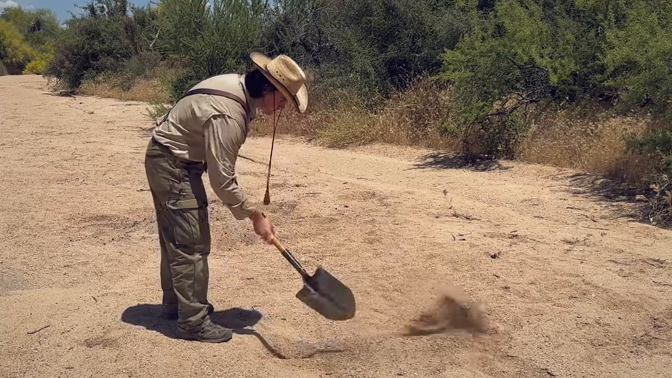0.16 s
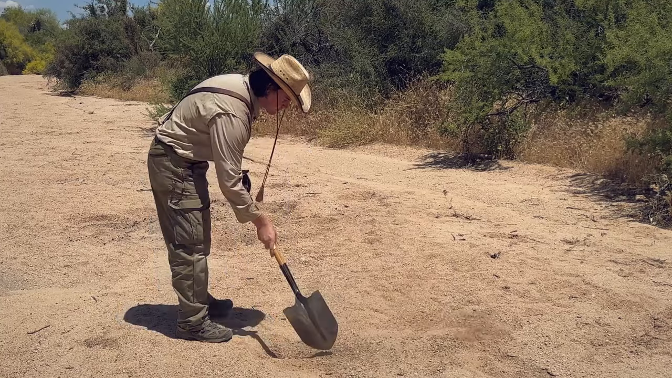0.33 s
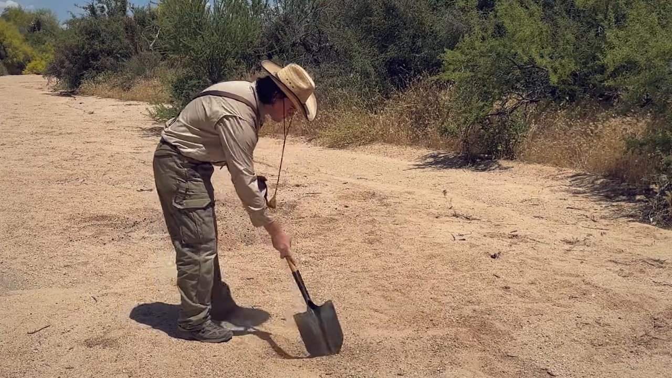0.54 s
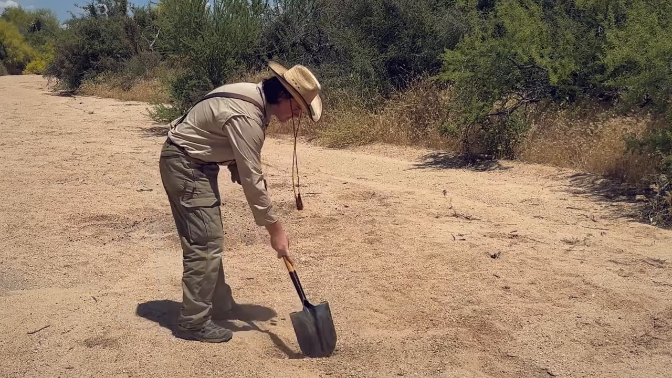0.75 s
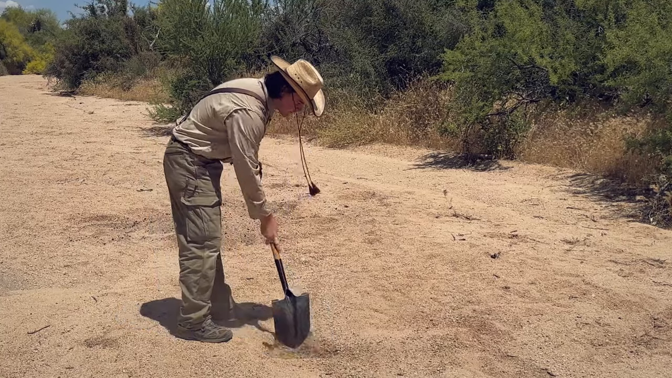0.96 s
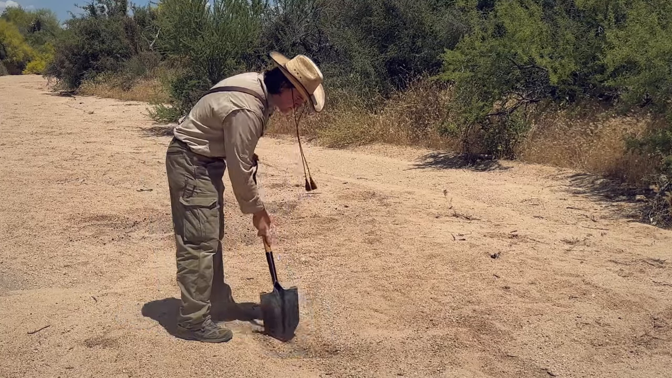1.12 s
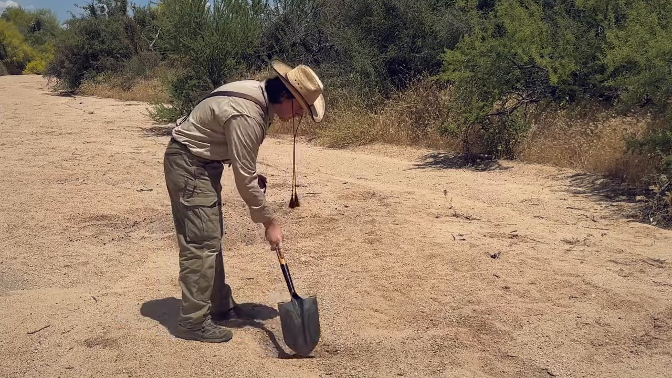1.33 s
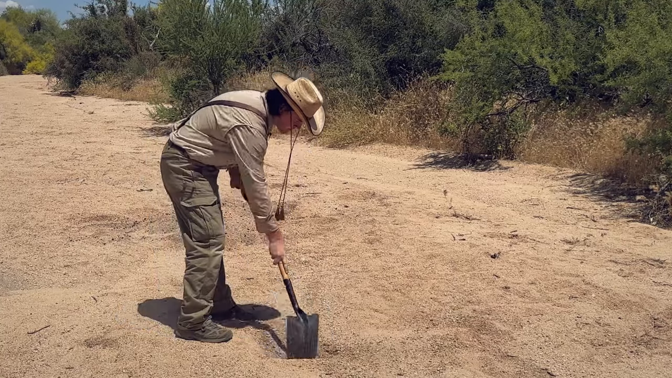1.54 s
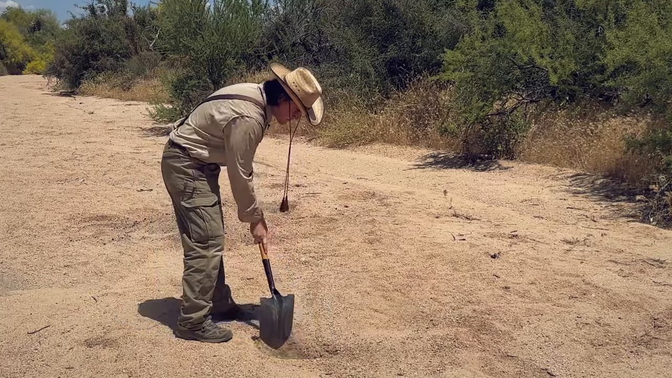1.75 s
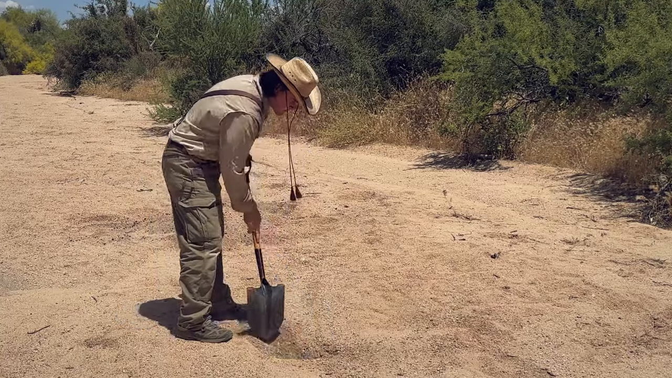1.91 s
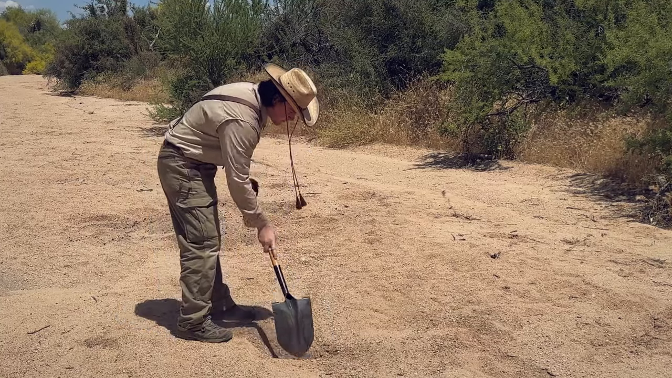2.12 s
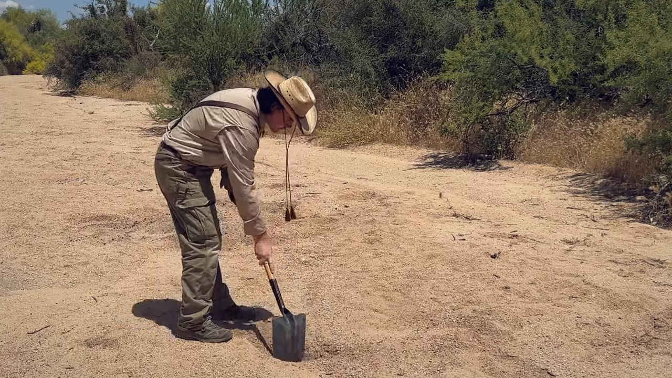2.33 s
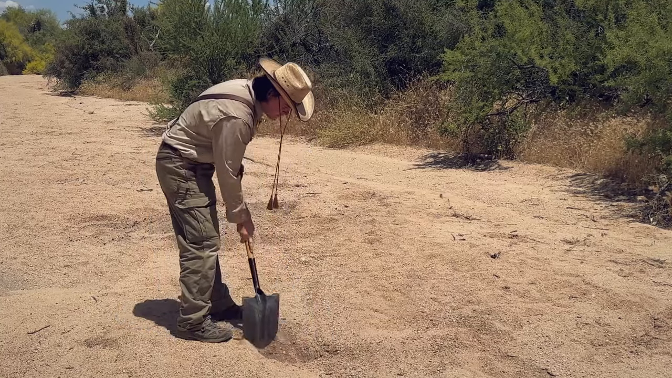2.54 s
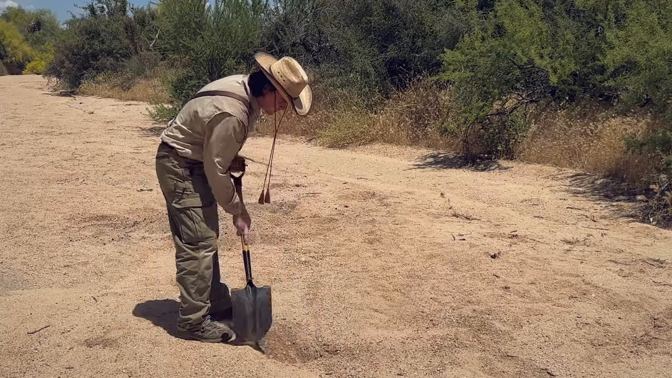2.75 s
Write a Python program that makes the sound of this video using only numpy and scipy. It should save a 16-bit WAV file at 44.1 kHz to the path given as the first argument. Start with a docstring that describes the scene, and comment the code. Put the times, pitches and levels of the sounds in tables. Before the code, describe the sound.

A steel shovel digs in dry, gravelly sand. Tossed sand patters down softly, then the blade dips, drags and stabs twice, with gritty crunches, pebble clicks and faint ringing. It sounds from straight ahead, over soft, low outdoor air.

```python
"""A steel shovel works dry, gravelly sand: a thrown load lands, then the blade dips, drags and stabs twice.
Thousands of grains click against the steel and make it ring, muffled by the soil. Pebbles snap on the
blade, packed gravel crunches where the edge catches, and the stabs thud against firm ground.
Clear of the soil, the blade rings on faintly. Behind it all lies a soft, low wash of outdoor air."""
import sys
import numpy as np
from scipy import signal
from scipy.fft import rfft, irfft
from scipy.io import wavfile

SR = 44100
rng = np.random.default_rng(int(sys.argv[2]) if len(sys.argv) > 2 else 0)


def inscribe(sig):
    """Save sig as 16-bit PCM at rate SR to the path in sys.argv[1].

    A 1-D sig is mono; a 2-D sig holds one channel per row.
    Samples are clipped to [-1, 1] before scaling.
    """
    pcm = np.round(np.clip(np.atleast_2d(sig).T, -1, 1) * 32767)
    wavfile.write(sys.argv[1], SR, pcm.astype(np.int16))


N = 127890


def undb(db):
    """Turn decibels into a number to multiply by."""
    return 10 ** (np.asarray(db) / 20)


def unit(x):
    """Scale a sound to an average (rms) level of 1."""
    return x / np.sqrt(np.mean(x ** 2))


def clock():
    """The time of each sample, in seconds."""
    return np.arange(N) / SR


def gain_curve(times, db):
    """A volume that follows the given points and is silent outside them."""
    return undb(np.interp(clock(), times, db, left=-200, right=-200))


def per_bin(points):
    """Read a table of (frequency, value) at every frequency of the spectrum."""
    hz, value = np.array(points, float).T
    return np.interp(np.log(np.arange(N // 2 + 1) * SR / N + 1), np.log(hz), value)


def colour(x, points):
    """Give a sound the tone in a table of (frequency, level)."""
    cepstrum = irfft(np.log(undb(per_bin(points))), N)
    # folding this in half makes the filter ring after each click, not before
    cepstrum[1:N // 2] *= 2
    cepstrum[N // 2 + 1:] = 0
    return irfft(rfft(x) * np.exp(rfft(cepstrum)), N)


def resonate(x, hz, width_hz):
    """Make a sound ring at one pitch; a narrower width rings longer."""
    return signal.lfilter(*signal.iirpeak(hz, hz / width_hz, fs=SR), x)


def wander(per_s):
    """A random curve drifting around zero, with per_s turning points a second."""
    steps = rng.standard_normal(4096)
    return np.interp(clock() * per_s, np.arange(len(steps)), steps)


def grains(per_s, spread_db):
    """Grains hit at random moments, as clicks of uneven size."""
    hit = rng.random(N) < per_s / SR
    size = undb(spread_db * np.minimum(rng.exponential(size=N), 6))
    return unit(hit * size * rng.choice([-1, 1], N))


def near(hz, focus_hz, octaves=.13):
    """How strongly a tone of the blade answers: less the farther it is from the focus pitch."""
    return 1 / (1 + (np.log2(hz / focus_hz) / octaves) ** 2)


# loudness of the thrown sand (time [s], level [dB])
THROW_LEVEL = [(0, -54), (.07, -66.5), (.172, -63.5), (.21, -42.5), (.235, -43), (.268, -46), (.295, -60.5),
               (.42, -72)]


def thrown_sand():
    """The load slides off the blade and patters to the ground."""
    tone = [(1500, -21), (4300, -7), (5600, -0.5), (8000, -2), (12000, -3), (16000, -3)]
    patter = colour(grains(per_s=7900, spread_db=3), tone)
    return unit(patter) * gain_curve(*np.array(THROW_LEVEL).T)


# tones of the free blade (pitch [Hz], relative level [dB], time to fade by 60 dB [s])
FREE_TONES = [(2300, 3, .4), (2380, -7, .4), (3220, 3, .8), (3510, -2, 0.36), (3580, 2.5, 0.55),
              (4200, 6, 0.73), (5000, 2, .4), (5340, 6, .4)]
# the blade comes free (time [s], base level [dB], focus pitch [Hz])
LIFTS = [(0, -59, 3640), (1.11, -60.5, 3540), (2.74, -61, 3460)]


def free_blade():
    """With no soil to muffle it, the steel rings on faintly."""
    out = np.zeros(N)
    for start, level_db, focus_hz in LIFTS:
        age = np.maximum(clock() - start, 0)
        for hz, db, fade_s in FREE_TONES:
            fade = undb(level_db + db - 60 * age / fade_s)
            out += fade * near(hz, focus_hz) * np.sin(2 * np.pi * hz * age)
    return out


# tone of the air (frequency [Hz], relative level [dB])
AIR_TONE = [(22, 1), (58, -1), (169, -5.5), (366, -6.5), (554, -4.5), (1040, -13.5), (1760, -20.5),
            (2820, -30.5), (3600, -35.5), (4300, -42), (7000, -49.5), (16000, -52)]
# how alike the two ears hear it (frequency [Hz], likeness [0 to 1])
AIR_LIKENESS = [(30, 0.073), (170, 0.21), (350, 0.37), (700, 0.82), (1400, 0.94), (3000, 1), (6000, .998)]
# which side is louder (frequency [Hz], left over right [dB])
AIR_BALANCE = [(35, 8), (80, -1), (170, -6.5), (350, -2), (700, -0.6), (1500, -0.5)]
# its slow swell (time [s], overall change [dB], extra bass [dB])
AIR_SWELL = [(0, 0.5, -2.5), (.6, 0, -1), (1.4, -1, 1.5), (2.1, 0, .5), (2.45, 0.5, 2), (2.9, -0.2, 2)]


def outdoor_air(wash_db=-41, hum_db=-53, hum_hz=60.6, bass_hz=129):
    """A low stereo wash, wide in the bass, with a faint wavering hum."""
    shared, side = rfft(rng.standard_normal((2, N)))
    alike = np.clip(per_bin(AIR_LIKENESS), 0, 1)
    ears = np.array([[1], [-1]])  # left, right
    noise = shared * np.sqrt(1 + alike) + ears * side * np.sqrt(1 - alike)
    tone = undb(per_bin(AIR_TONE) + ears * per_bin(AIR_BALANCE) / 2)
    wash = unit(irfft(noise * tone, N))
    hum = np.sin(2 * np.pi * np.cumsum(hum_hz + 3.1 * wander(7)) / SR)
    steady = undb(wash_db) * wash + undb(hum_db) * hum
    bass = signal.sosfiltfilt(signal.butter(2, bass_hz, fs=SR, output="sos"), steady)
    times, swell_db, bass_db = np.array(AIR_SWELL).T
    swelling_bass = bass * undb(np.interp(clock(), times, bass_db))
    return (steady - bass + swelling_bass) * undb(np.interp(clock(), times, swell_db))


# pebble hits (time [s], level [dB], pitch [Hz])
PEBBLE_HITS = [(.126, -57, 9000), (0.264, -38, 11000), (.341, -48.5, 4120), (1.395, -30.5, 9350),
               (1.515, -30.5, 11000), (1.677, -35, 10500), (1.752, -25, 6100), (1.825, -22.5, 7000)]


def pebbles(decay_s=.003):
    """Single pebbles strike the steel with bright snaps that die at once."""
    out = np.zeros(N)
    for start, db, hz in PEBBLE_HITS:
        age = clock() - start
        snap = unit(resonate(rng.standard_normal(N), hz, width_hz=.27 * hz))
        out += undb(db) * snap * (age > 0) * np.exp(-np.abs(age) / decay_s)
    return out


def steel_shimmer(clicks, fade_s=.05, ring_db=-5):
    """Each click plus its short ring in the many crowded high tones of the steel."""
    t = clock()[:N // 16]
    tail = rng.standard_normal(len(t)) * undb(-60 * t / fade_s)
    return clicks + undb(ring_db) * signal.fftconvolve(clicks, tail / np.linalg.norm(tail))[:N]


# tone of hissing sand and of crunching soil (frequency [Hz], relative level [dB])
GRIT_TONE = [(150, -25), (400, -8), (900, -7.5), (1900, -3.5), (3000, -7.5), (4200, -2), (6000, 0.5),
             (7300, -1), (9500, -1.5), (11000, -3.5), (13000, -2), (16000, -20)]
CRUNCH_TONE = [(100, -23.5), (300, -13.5), (450, 1.5), (680, -11.5), (900, -17.5), (1150, -2.5),
               (1900, -16.5), (3500, -66), (8000, -6)]
# tones of the blade muffled by soil (pitch [Hz], width [Hz], relative level [dB])
BLADE_TONES = [(733, 83, 0), (1088, 10.6, 2), (1547, 59, -2.5), (2286, 21, -9.5), (2344, 20, -0.5),
               (2487, 56, 4), (2680, 130, -2), (2822, 180, -0.5), (2955, 76, -2), (3230, 38, 1),
               (3410, 66, -4), (3645, 78, -2), (4630, 130, -4.5), (5626, 40, -4.5)]
# loudness of each stroke before the trims (time [s], hiss level [dB], ring level [dB])
DIP = [(0.42, -84, -71), (0.424, -93, -84), (0.434, -47.5, -49), (0.45, -34, -38.5), (0.508, -36.5, -34),
       (0.534, -55, -63), (0.58, -56, -55.5), (0.622, -52, -53.5), (0.654, -68, -62), (0.66, -66, -74)]
DRAG = [(0.66, -71, -69), (0.686, -46, -46.5), (0.72, -34, -38), (0.812, -37.5, -41), (0.824, -32.5, -35),
        (0.848, -37, -46.5), (0.94, -27, -33), (0.972, -32, -48), (1.004, -30, -37), (1.038, -25, -45),
        (1.09, -33, -36.5), (1.148, -58.5, -59), (1.262, -68, -79), (1.342, -77, -67), (1.36, -83, -78)]
FIRST_STAB = [(1.38, -84, -79), (1.388, -84, -77), (1.392, -55, -45), (1.398, -34, -37.5),
              (1.434, -33, -33), (1.512, -47, -52.5), (1.518, -40, -50), (1.536, -52.5, -55.5),
              (1.626, -40, -47.5), (1.694, -45, -50), (1.74, -41, -50), (1.756, -32, -28.5),
              (1.774, -44.5, -44), (1.818, -37.5, -49), (1.826, -32.5, -46), (1.838, -33.5, -60),
              (1.85, -30, -43), (1.858, -39.5, -53), (1.95, -64, -75), (2.084, -76, -83), (2.15, -91, -80)]
SECOND_STAB = [(2.19, -49, -54), (2.196, -36, -46), (2.218, -29, -32), (2.262, -37, -42), (2.274, -49, -52),
               (2.344, -34, -42), (2.398, -36, -43), (2.404, -32, -37), (2.428, -35, -41),
               (2.456, -29, -42), (2.464, -31, -38), (2.498, -33, -39), (2.508, -39, -48),
               (2.546, -33, -41), (2.556, -29, -32), (2.67, -49, -59), (2.702, -48, -52), (2.87, -83, -76)]
# strokes (loudness table, edge bites [s], blade pitch [ratio], sizzle [dB], crunch [dB]);
# sizzle and crunch are relative to the hiss
STROKES = [(DIP, .432, 0.94, -8, -23), (DRAG, .662, 0.97, -5, -16.5), (FIRST_STAB, 1.395, 1.008, -6, -8.5),
           (SECOND_STAB, 2.193, 1.003, -7.5, -7.5)]


def scrapes(hiss_trim_db=-.56, ring_trim_db=-.06, bite_s=.00055, sizzle_hz=10280, sizzle_width_hz=4200):
    """Sand sticks and slips along the blade: grains hiss, dust sizzles, soil crunches, steel rings."""
    judder = undb(2.02 * wander(per_s=170))  # the sticking and slipping
    sand, dust, soil, taps = (grains(per_s=13000, spread_db=3) * judder for _ in range(4))
    grit = unit(colour(sand, GRIT_TONE))
    crunch = unit(colour(soil, CRUNCH_TONE))
    bright_dust = resonate(dust, sizzle_hz, sizzle_width_hz)
    sizzle = unit(resonate(bright_dust, sizzle_hz, sizzle_width_hz))
    out = np.zeros(N)
    for curve, bite_at, pitch, sizzle_db, crunch_db in STROKES:
        times, hiss_db, ring_db = np.array(curve).T
        hiss = unit(steel_shimmer(grit + undb(sizzle_db) * sizzle)) + undb(crunch_db) * crunch
        hiss *= gain_curve(times, hiss_db + hiss_trim_db)
        ring = unit(sum(undb(db) * resonate(taps, hz * pitch, width) for hz, width, db in BLADE_TONES))
        ring *= gain_curve(times, ring_db + ring_trim_db)
        contact = np.clip((clock() - bite_at) / bite_s, 0, 1)
        out += contact * (hiss + ring)
    return out


# the edge catches (time [s], length [s], crunch level [dB], ring level [dB], focus pitch [Hz])
GRAVEL_CATCHES = [(0.493, 0.0081, -42, -29.5, 2520), (0.5, 0.009, -48, -32, 2530),
                  (0.504, 0.025, -54, -41.5, 1535), (0.906, 0.023, -41, -42, 720),
                  (1.021, 0.045, -58, -33.5, 2340), (1.437, 0.011, -36, -34.5, 3730),
                  (1.755, .013, -32, -39, 2970), (2.212, 0.026, -50, -34.5, 3580),
                  (2.217, 0.054, -59, -40.5, 1085), (2.448, 0.079, -38, -51, 2950),
                  (2.551, .02, -37, -34.5, 2290), (2.575, 0.034, -52, -46, 3300)]


def gravel_catches(rise_s=.001):
    """Packed gravel gives way with a crunch; where it meets the blade decides which tones ring."""
    gravel = grains(per_s=7100, spread_db=-.5)
    start, length, crunch_db, ring_db, focus_hz = np.array(GRAVEL_CATCHES).T
    age = np.maximum(clock() - start[:, None], 0)  # one row per catch
    push = np.minimum(age / rise_s, 1) * np.exp(-np.minimum(age / length[:, None], 10) ** 2)
    crunch = undb(crunch_db) @ push * unit(colour(gravel, CRUNCH_TONE))
    # share each catch's ring level among the blade's tones
    pitches, widths, tone_db = np.array(BLADE_TONES).T
    share = undb(tone_db) * near(pitches, focus_hz[:, None])
    share *= (undb(ring_db) / np.linalg.norm(share, axis=1))[:, None]
    ring = np.zeros(N)
    for force, hz, width in zip(share.T @ push, pitches, widths):
        # dividing makes narrow and wide tones equally strong
        ring += resonate(gravel * force, hz, width) / np.sqrt(np.pi * width / SR)
    return crunch + ring


# the blade is driven home (time [s], level [dB], pitch [Hz])
SOIL_THUDS = [(1.755, -31, 660), (1.756, -27, 1130), (2.215, -36, 400), (2.555, -38, 720),
              (2.565, -36, 440)]


def thuds(rise_s=.001, decay_s=.01, width_hz=380):
    """Firm soil stops the blade with a short, hollow knock."""
    out = np.zeros(N)
    for start, db, hz in SOIL_THUDS:
        age = np.maximum(clock() - start, 0)
        noise = rng.standard_normal(N)
        knock = unit(resonate(resonate(noise, hz, width_hz), hz, width_hz))
        out += undb(db) * knock * np.minimum(age / rise_s, 1) * np.exp(-age / decay_s)
    return out


def scene():
    """The shovel straight ahead, the air all round."""
    shovel = thrown_sand() + free_blade() + pebbles() + scrapes() + gravel_catches() + thuds()
    return shovel + outdoor_air()


def record(dry):
    """Cut away the very highest treble."""
    top_hz = 16000
    return signal.sosfilt(signal.ellip(10, .1, 80, top_hz, fs=SR, output="sos"), dry)


dry = scene()
out = record(dry)
inscribe(out)
```